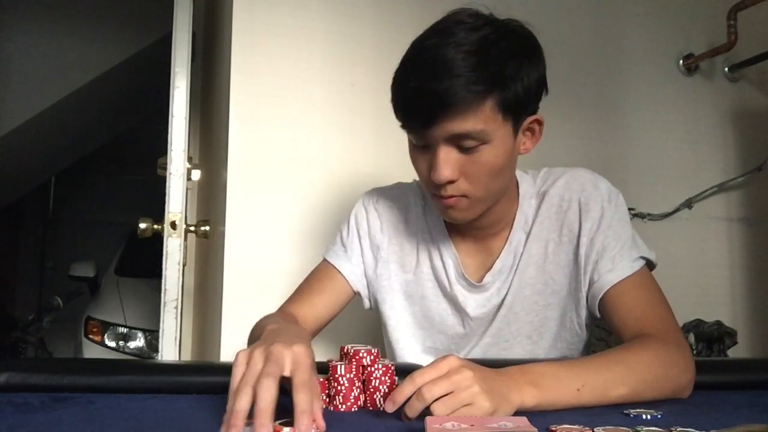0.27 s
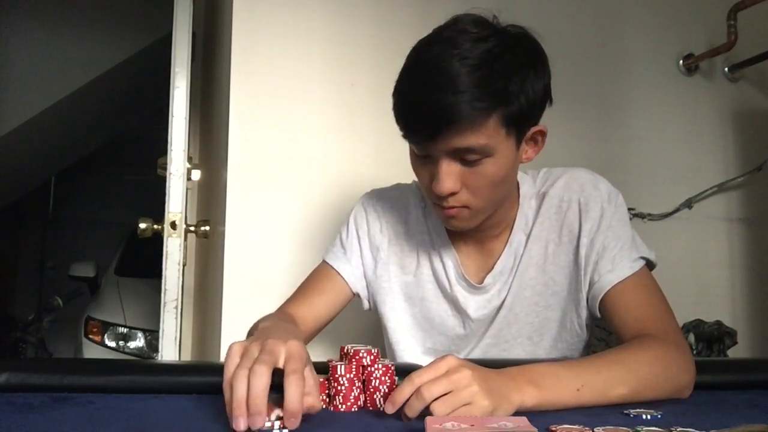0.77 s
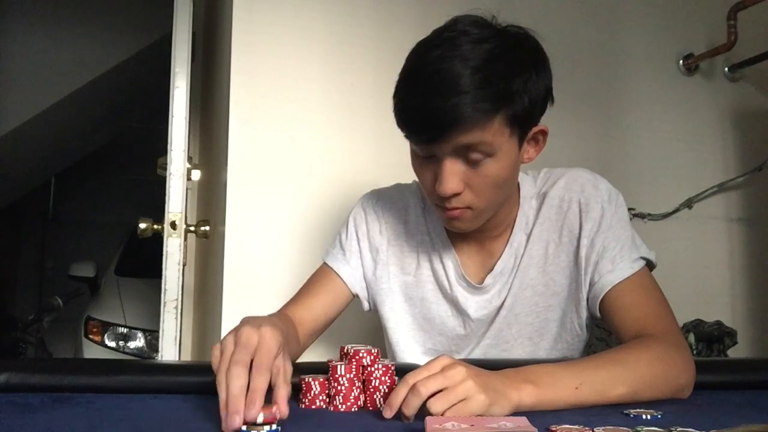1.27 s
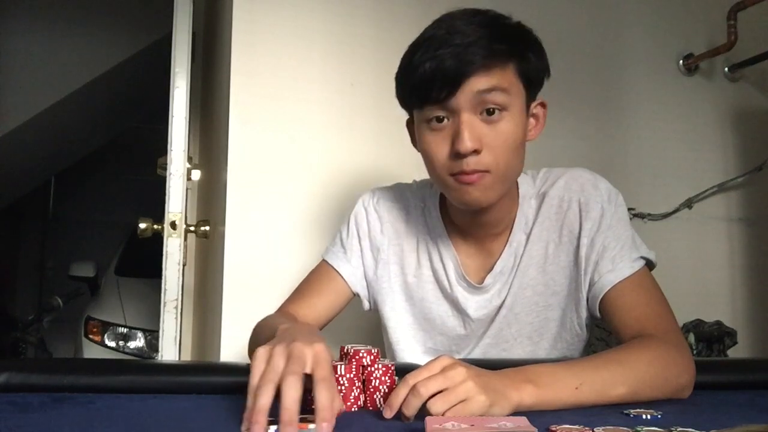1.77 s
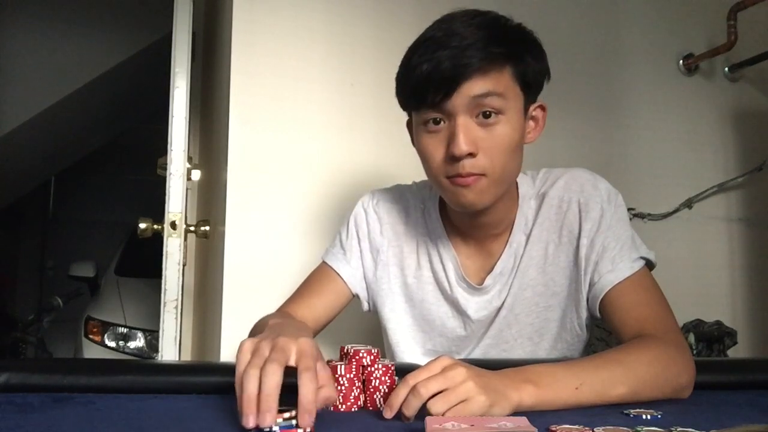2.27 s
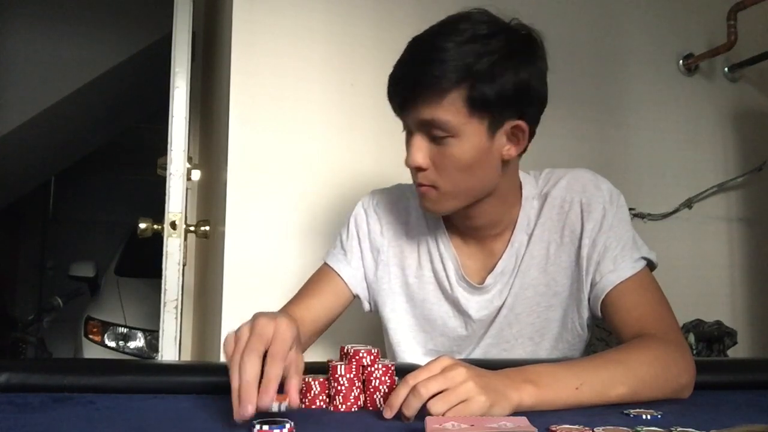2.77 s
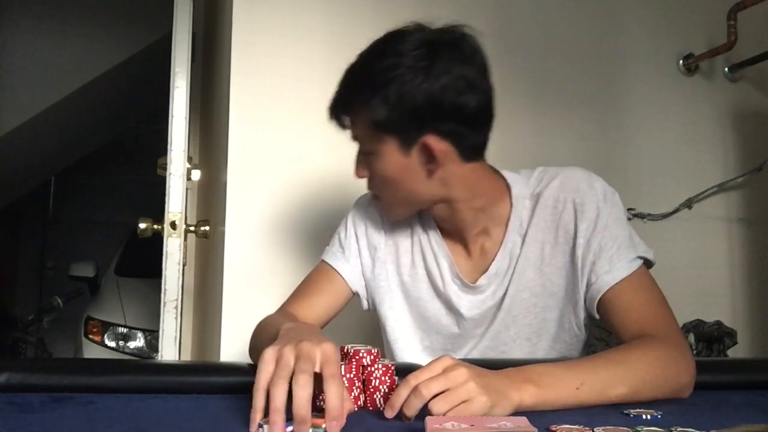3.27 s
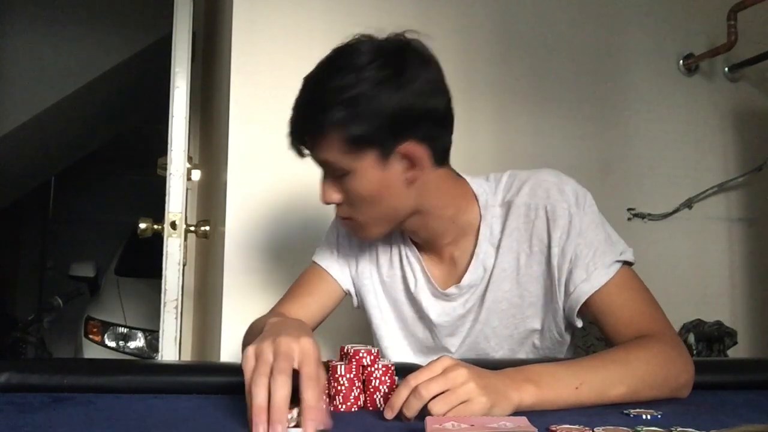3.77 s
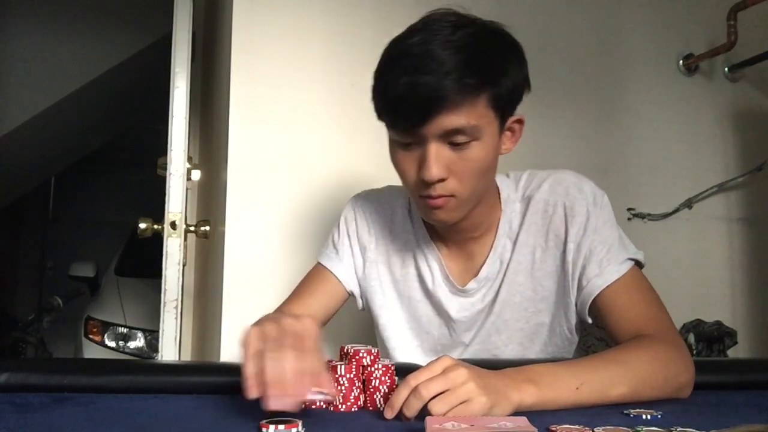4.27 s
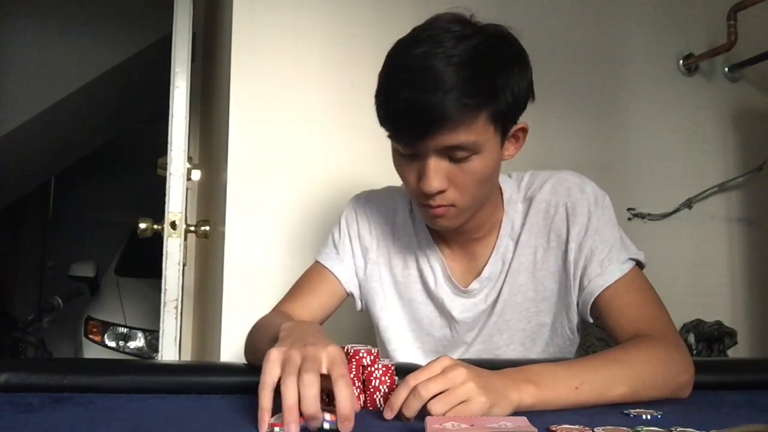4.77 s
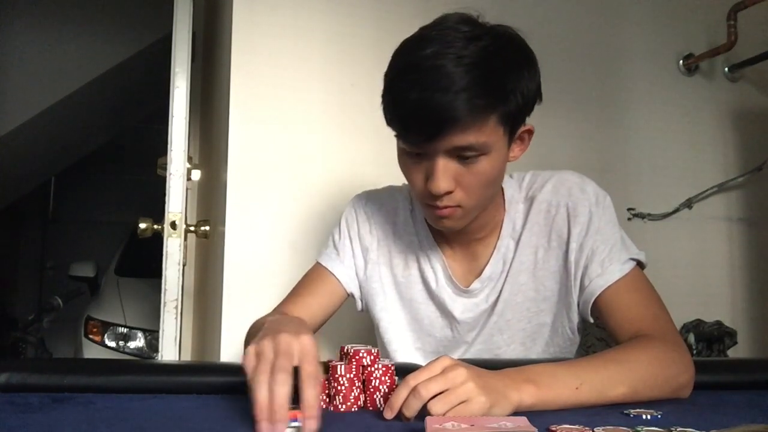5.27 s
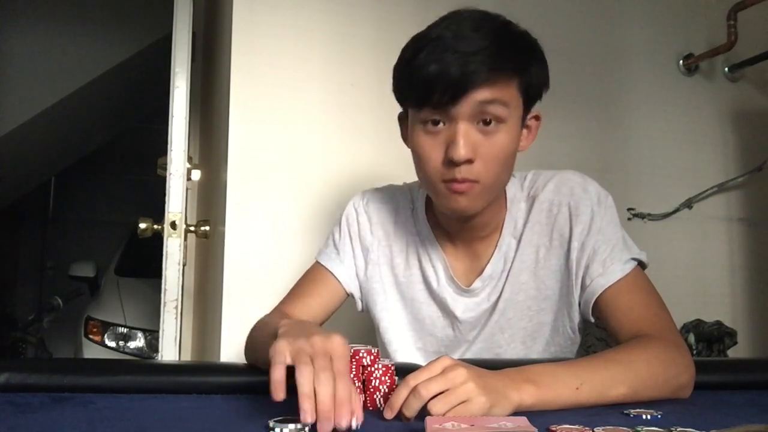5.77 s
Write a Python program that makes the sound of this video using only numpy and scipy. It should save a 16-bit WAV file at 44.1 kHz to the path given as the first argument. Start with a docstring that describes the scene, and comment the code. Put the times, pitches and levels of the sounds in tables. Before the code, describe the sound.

Plastic poker chips riffled together four times in short clicking bursts, with lighter clacks and soft table thumps between, in a small room.

```python
"""Plastic chips on a padded table

Close microphone in a small hard-walled room. Fingers lift, riffle and drop chips onto a stack.
Each contact is a short chatter that knocks the stack and rings the free discs; the table top booms
underneath. The room adds a short tail, over a faint steady hiss."""
import sys
import numpy as np
from scipy import signal
from scipy.fft import rfft, irfft, next_fast_len
from scipy.io import wavfile

SR = 44100
rng = np.random.default_rng(int(sys.argv[2]) if len(sys.argv) > 2 else 0)


def wrap_up_sound(samples):
    """Save the sound to the file named by the first command line argument, as 16-bit audio."""
    columns = np.atleast_2d(samples).T
    # keep every value between -1 and 1, then stretch to whole-number steps
    tamed = np.clip(columns, -1, 1)
    steps = np.round(tamed * 32767).astype(np.int16)
    wavfile.write(sys.argv[1], SR, steps)


N = 265923

# Chips landing, heard in the stack and through the table: start_s, knock_db, disc_db, centre_hz
LANDINGS = [(0.182, -24, -27.5, 2600), (0.303, -27, -40, 2050), (0.65, -23, -34, 2460),
            (0.706, -28, -36.5, 4300), (0.72, -5.5, -3, 2550), (0.751, -11, -12.5, 2820),
            (0.757, -14.5, -1, 2640), (0.795, -6, 2, 2120), (0.841, -10.5, 3.5, 3600),
            (0.875, -12.5, 0, 2000), (0.885, -31, -7, 2500), (0.896, -13, -9.5, 3160),
            (1.028, -28, -36, 2420), (1.041, -29.5, -32.5, 3400), (1.287, -42.5, -55.5, 2240),
            (1.607, -29, -34, 2980), (1.796, -31.5, -35.5, 2287), (2.088, -32, -53, 4600),
            (2.131, -31, -28, 3590), (2.155, -10.5, -8.5, 3000), (2.162, -20.5, -0.5, 2540),
            (2.183, -10.5, -2, 3040), (2.215, -16, -1, 2980), (2.222, -12.5, -6, 2730),
            (2.242, -7.5, -4, 2920), (2.276, -14, 1, 2780), (2.314, -22, -5.5, 3030),
            (2.504, -24, -31.5, 2070), (2.6, -23.5, -30, 2088), (3.065, -16, -14, 1910),
            (3.183, -38.5, -41, 2980), (3.267, -35, -43, 1850), (3.391, -42, -55, 2050),
            (3.435, -44, -70, 1768), (3.458, -41.5, -45.5, 3780), (3.501, -35, -43, 4740),
            (3.514, -29, -34.5, 4270), (3.54, -15.5, -14, 1720), (3.597, -13, -18, 2010),
            (3.628, -14.5, -0.5, 3080), (3.649, -16.5, -0.5, 1880), (3.656, -13, -1.5, 2980),
            (3.679, -25, -5, 3600), (3.683, -13, -4.5, 2995), (3.882, -21.5, -22, 2660),
            (3.979, -38, -33.5, 2420), (4.015, -13.5, -20.5, 2650), (4.019, -12, -11, 2300),
            (4.028, -21.5, -28.5, 1800), (4.048, -20.5, -22, 1510), (4.192, -20, -25, 2390),
            (4.461, -12.5, -20, 3266), (4.607, -35.5, -52.5, 2752), (4.647, -35.5, -32.5, 2964),
            (4.678, -28.5, -38.5, 3670), (4.914, -44.5, -61.5, 3200), (4.961, -32.5, -37.5, 2650),
            (5.039, -8.5, -12, 2960), (5.05, -10, -20, 2120), (5.071, -12.5, 1.5, 1860),
            (5.087, -13.5, -18.5, 2160), (5.107, -10.5, 5, 2420), (5.146, -15, -1, 3510),
            (5.165, -17.5, 5, 3620), (5.333, -23.5, -30.5, 2270), (5.35, -26, -32.5, 2320),
            (5.434, -13, -14, 2350), (5.606, -30, -41, 2300), (5.903, -23, -19, 2570),
            (5.976, -20.5, -29, 3590)]


def amp(db):
    """Decibels to amplitude."""
    return 10 ** (np.asarray(db) / 20)


def spectrum_curve(points, size):
    """Values of (Hz, value) points at every FFT bin, straight on a log-frequency axis."""
    hz, value = np.transpose(points)
    return np.interp(np.log(np.fft.rfftfreq(size, 1 / SR) + 1), np.log(hz), value)


def ring(times, gains, modes, detune, damp_db_per_s=0.):
    """Blows ring decaying modes, with a gain and a relative detuning for each blow and mode."""
    out, onsets = np.zeros(N + SR), (times * SR).astype(int)
    for (hz, t60, db), gain, offset in zip(modes, gains.T, detune.T):
        n = np.arange(int(t60 * SR))
        decay = amp(db - (60 / t60 + damp_db_per_s) * n / SR)
        waves = np.sin(2 * np.pi * hz / SR * np.outer(1 + offset, n)) * decay
        out += np.bincount((onsets[:, None] + n).ravel(), (gain[:, None] * waves).ravel(), N + SR)
    return out[:N]


def hiss(level_db=-63.5):
    """Steady faint noise of room and microphone."""
    # Noise floor spectrum: frequency_hz, density_db
    noise_floor = [(18, -32.5), (30, -2.5), (134, -4), (486, -11.5), (1760, -14.5), (6900, -20.5),
                   (10500, -26.5), (14800, -24.5), (16000, -36)]
    size = next_fast_len(N)
    noise = irfft(rfft(rng.standard_normal(size)) * amp(spectrum_curve(noise_floor, size)), size)[:N]
    return amp(level_db) * noise / noise.std()


def room(direct, echo_s=.007, echo_db=-13, rise_s=.0069, tail_db=-8):
    """Hard walls add one near echo and a diffuse tail that dies faster in the treble."""
    # Decay of the room: frequency_hz, t60_s
    decay_times = [(200, 0.29), (1000, 0.28), (4000, 0.27), (8000, 0.26), (12000, 0.17), (16000, 0.05)]
    t = np.arange(SR // 2) / SR
    noise, tail = rfft(rng.standard_normal(len(t))), 0
    for band_hz, t60 in decay_times:
        band = spectrum_curve([(hz, float(hz == band_hz)) for hz, _ in decay_times], len(t))
        tail += irfft(noise * band) * amp(-60 * t / t60) / np.sqrt(t60)
    tail *= 1 - np.exp(-(t / rise_s) ** 2)
    tail *= amp(tail_db) / np.linalg.norm(tail)
    tail[int(echo_s * SR)] += amp(echo_db)
    return direct + signal.fftconvolve(direct, tail)[:N]


def table_top(padding_s=.0043, boom_gain_db=-4.5, chip_boom_db=-24, chip_upper_db=-28, spot_db=1.5):
    """Thumps softened by the padding ring the board; returns its low boom and its upper modes."""
    # Low thumps of the table and faint after-swells as it rings on: start_s, boom_db, upper_db
    thumps = [(0.179, -23.5, -32.5), (0.302, -32.5, -47.5), (0.719, -24, -34.5), (0.851, -25, -34.5),
              (1.037, -30, -42.5), (1.156, -38, -63), (1.269, -41, -59), (1.609, -32.5, -40),
              (1.732, -30, -48.5), (2.156, -33, -39), (2.299, -32, -36.5), (2.4, -31.5, -52),
              (2.468, -32.5, -46.5), (2.602, -23, -41.5), (2.73, -38.5, -60.5), (3.069, -25, -34),
              (3.165, -29.5, -52.5), (3.531, -25.5, -27.5), (3.599, -28, -34), (3.731, -37.5, -43),
              (3.875, -33, -37.5), (4.02, -26.5, -44), (4.107, -43, -69), (4.456, -32.5, -53),
              (4.577, -42, -57), (5.043, -23.5, -48), (5.168, -24, -31), (5.328, -36, -48),
              (5.432, -25.5, -47), (5.581, -40.5, -58), (5.898, -32.5, -53)]
    # Low modes of the board: pitch_hz, t60_s, level_db
    low_modes = [(58, 0.04, -10.5), (108, 0.12, -9.5), (121.4, 0.32, -3), (128.2, 0.22, 2.5),
                 (140.1, 0.36, -2.5)]
    # Upper modes of the board: pitch_hz, t60_s, level_db
    upper_modes = [(180, 0.15, -8), (213, 0.08, -4.5), (267.7, 0.13, 1), (308, 0.1, 4), (388.4, 0.14, 3.5),
                   (450, 0.074, 4), (600, 0.069, -2)]
    thump_s, boom_db, upper_db = np.transpose(thumps)
    landing_s, knock_db = np.transpose(LANDINGS)[:2]
    times = np.r_[thump_s, landing_s]
    boom_gain = amp(np.r_[boom_db, knock_db + chip_boom_db] + boom_gain_db)
    upper_gain = amp(np.r_[upper_db, knock_db + chip_upper_db])
    # Where the hand rests detunes the low modes a little.
    hand_detune = .027 * rng.standard_normal((len(times), len(low_modes)))
    # Close modes start opposed, so the boom swells and dips.
    boom = ring(times, np.outer(boom_gain, (-1) ** np.arange(len(low_modes))), low_modes, hand_detune)
    # Each spot on the board favours other modes.
    spot = rng.standard_normal((len(times), 2, len(upper_modes)))
    spot_gain = amp(spot_db * spot[:, 0]) * (-1) ** np.arange(len(upper_modes))
    upper = ring(times, upper_gain[:, None] * spot_gain, upper_modes, detune=.074 * spot[:, 1])
    padding = np.hanning(int(padding_s * SR))
    return [np.convolve(modes, padding / padding.sum())[:N] for modes in (boom, upper)]


def looseness(knock_db, disc_db, gripped_db=-11, free_db=5):
    """0 for chips gripped by the fingers, 1 for free ones whose ring outweighs the knock."""
    return np.clip((disc_db - knock_db - gripped_db) / (free_db - gripped_db), 0, 1)


def chip_contacts(times, knock_db, disc_db, centre_hz, loose, scatter_db=2, crack_db=2):
    """Each contact knocks the stack modes near its centre pitch, rings the discs and gives a crack."""
    # Modes of the stack: pitch_hz, t60_s, level_db
    stack_modes = [(680, 0.022, -5), (915, 0.016, -2.5), (1302, 0.0081, 6), (1710, 0.0066, 3.5),
                   (2300, 0.0046, 1), (3257, 0.0034, 5), (4450, 0.012, 7)]
    # Modes of a single disc: pitch_hz, t60_s, level_db
    disc_modes = [(4160, 0.015, -9.5), (5270, 0.025, -11.5), (5943, 0.0067, 4), (6400, 0.011, -11),
                  (6912, 0.016, -0.5), (6920, 0.005, -5), (8020, 0.004, -17.5), (9253, 0.04, -15),
                  (9700, 0.0055, -9.5), (11240, 0.02, -14.5), (13100, 0.031, -23.5), (14200, 0.0062, -12),
                  (15200, 0.0096, -7.5)]
    split = len(stack_modes)
    draws = rng.standard_normal((len(times), 3, split + len(disc_modes)))
    polarity, scatter, detune = draws.swapaxes(0, 1)
    gain = np.sign(polarity) * amp(scatter_db * scatter)
    knock, disc = amp(knock_db)[:, None], amp(disc_db)[:, None]
    grip = 1 - loose[:, None]
    damp_db_per_s = 7000 * grip  # squeezed discs lose their clear ring
    octaves_away = np.log2(np.array(stack_modes)[:, 0] / centre_hz[:, None])
    width_octaves = .39 * (1 + loose[:, None])
    stack_gain = knock * np.exp(-.5 * (octaves_away / width_octaves) ** 2) * gain[:, :split]
    # Stack height shifts the knock.
    out = ring(times, stack_gain, stack_modes, .04 * detune[:, :split], damp_db_per_s)
    # A gripped stack also rings as one column: a unit mode scaled to just under the centre pitch.
    column_hz = .95 * centre_hz[:, None] * (1 + .03 * detune[:, -1:])
    out += ring(times, knock * gain[:, -1:] * grip ** 2, [(1, .007, 1)], column_hz - 1)
    disc_detune = (.024 + .1 * grip) * detune[:, split:]
    out += ring(times, disc * gain[:, split:], disc_modes, disc_detune, damp_db_per_s)
    crack = np.bincount((times * SR).astype(int), amp(disc_db + crack_db) * gain[:, 0], N)
    return out + np.diff(crack, prepend=0)


def rim_ticks(outline_s, disc_db, knock_db, centre_hz, per_s, scatter_db):
    """Random light rim contacts along a level outline, as the five inputs of chip_contacts."""
    length_s = outline_s[-1] - outline_s[0]
    when, force, pitch = rng.random((int(per_s * length_s) + 1, 3)).T
    times = outline_s[0] + length_s * when
    force_db = scatter_db * (force - .5)
    disc, knock = np.interp(times, outline_s, disc_db), np.interp(times, outline_s, knock_db)
    hz = centre_hz * 2 ** (pitch - .5)
    return times, knock - 14 + force_db, disc - 12 + force_db, hz, looseness(knock, disc)


def rubs(rise_share=.4, start_db=-5.5, end_db=-5):
    """Chips grate between the fingers in uneven ticks that swell and fade."""
    # Fingers rubbing chips together: start_s, length_s, disc_db, knock_db, centre_hz
    strokes = [(0.158, 0.029, -42, -36, 2060), (0.399, 0.015, -55, -37.5, 1436),
               (0.565, 0.07, -62, -38, 2100), (0.998, 0.044, -33, -30, 2500),
               (1.779, 0.083, -50, -30.5, 2295), (2.049, 0.054, -56, -38, 2200),
               (2.461, 0.054, -37, -34.5, 1930), (2.587, 0.014, -47, -23.5, 1770),
               (2.78, 0.013, -82, -41, 1314), (3.243, 0.051, -57, -42, 1640),
               (3.432, 0.13, -58.5, -36.5, 2370), (3.865, 0.028, -29.5, -28, 2100),
               (3.952, 0.055, -45, -32.5, 2057), (4.176, .02, -40.5, -26.5, 1934),
               (4.646, 0.055, -44, -25, 2336), (4.933, .05, -51, -35, 2517),
               (5.022, .025, -40.5, -30.5, 2100), (5.317, 0.036, -32, -26, 2375)]
    share, fade_db = np.array([0, rise_share, 1]), np.array([start_db, 0, end_db])
    ticks = [rim_ticks(start + length * share, disc + fade_db, knock + fade_db, hz,
                       per_s=600, scatter_db=16)
             for start, length, disc, knock, hz in strokes]
    return chip_contacts(*np.hstack(ticks))


def riffles(swell_db=8, settle_s=.1, settle_db=-25):
    """Rims tick past each other; the ring grows as chips come free, then everything settles."""
    # Two stacks sliding into one: start_s, length_s, peak_disc_db, knock_db
    slides = [(0.72, 0.18, -14, -28), (2.161, 0.13, -8.5, -20.5), (3.6, .075, -8.5, -21.5),
              (5.042, 0.13, -10, -19.5)]
    ticks = []
    for start, length, disc, knock in slides:
        outline_s = [start, start + length, start + length + settle_s]
        disc_db = [disc - swell_db, disc, disc + settle_db]
        knock_db = [knock, knock, knock + settle_db]
        ticks.append(rim_ticks(outline_s, disc_db, knock_db, centre_hz=2200, per_s=800, scatter_db=9))
    return chip_contacts(*np.hstack(ticks))


def clacks(contacts=6, gripped_s=.0017, free_s=.007):
    """A chip never lands flat: a few contacts swell and fade, spread wider when the chips are free."""
    start_s, knock_db, disc_db, centre_hz = np.repeat(np.transpose(LANDINGS), contacts, axis=1)
    loose = looseness(knock_db, disc_db)
    length_s = gripped_s + (free_s - gripped_s) * loose
    progress = ((np.arange(contacts) + rng.random((len(LANDINGS), contacts))) / contacts).ravel()
    times = start_s + length_s * progress
    swell_db = np.interp(progress, [0, .28, 1], [-7, 0, -9])
    return chip_contacts(times, knock_db - 7 + swell_db, disc_db - 12 + swell_db, centre_hz, loose)


def scene(chip_low_hz=430, board_send_db=.5):
    """Chips and the board's upper modes reach the walls; the boom comes straight to the microphone."""
    boom, upper = table_top()
    no_bass = signal.butter(2, chip_low_hz, "high", fs=SR, output="sos")  # small discs radiate no bass
    chips = signal.sosfilt(no_bass, clacks() + riffles() + rubs())
    return (room(chips + amp(board_send_db) * upper) + upper + boom + hiss())[None]


def record(dry, low_hz=42, top_hz=15900):
    """The microphone drops the deep bass, the loudest peaks are rounded and the top is cut."""
    low_cut = signal.sosfilt(signal.butter(3, low_hz, "high", fs=SR, output="sos"), dry)
    rounded = np.tanh(.63 * low_cut) / .65
    return signal.sosfilt(signal.ellip(14, .2, 95, top_hz, fs=SR, output="sos"), rounded)


dry = scene()
out = record(dry)
wrap_up_sound(out)
```